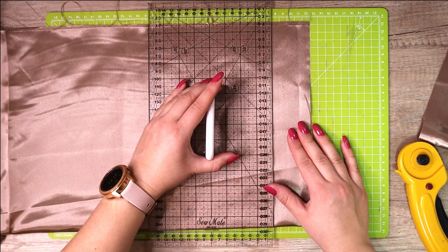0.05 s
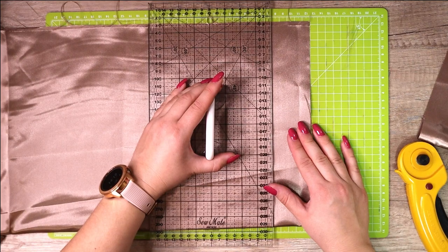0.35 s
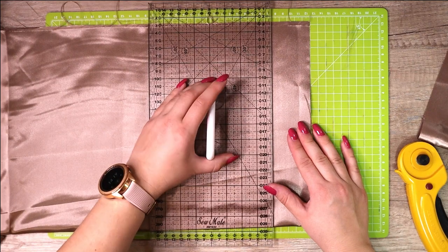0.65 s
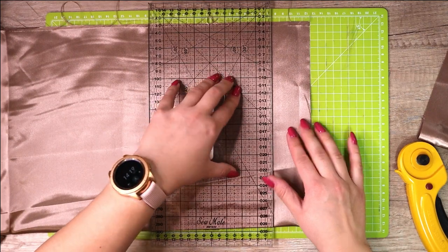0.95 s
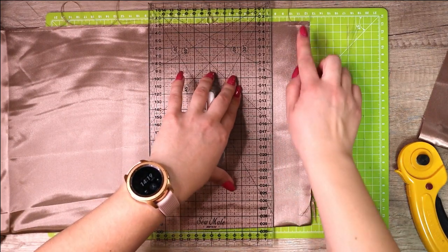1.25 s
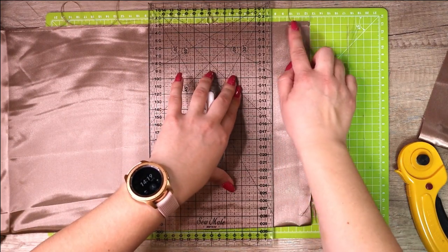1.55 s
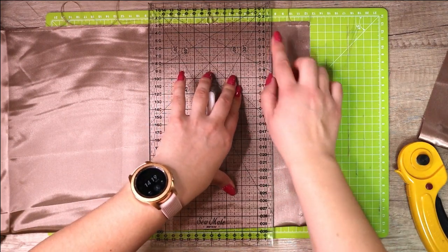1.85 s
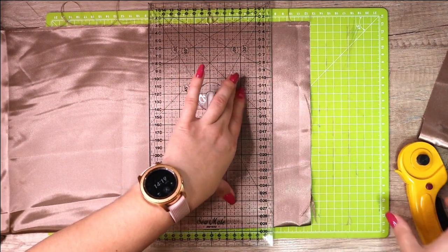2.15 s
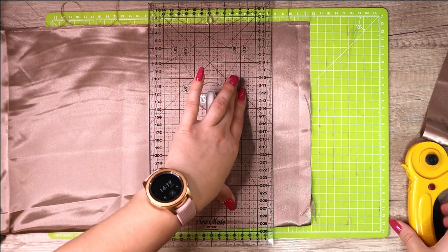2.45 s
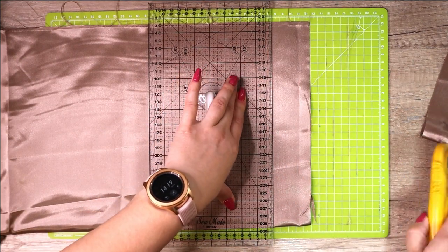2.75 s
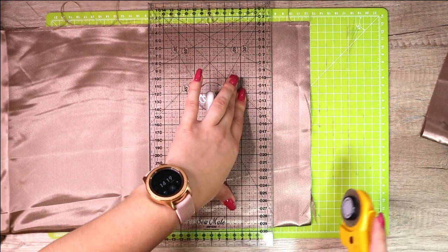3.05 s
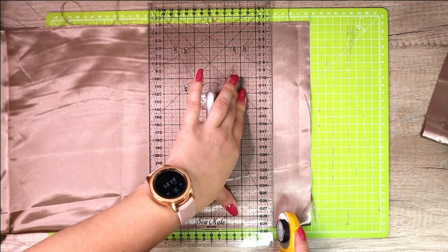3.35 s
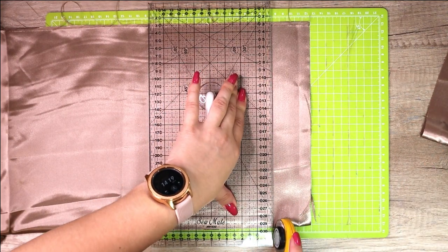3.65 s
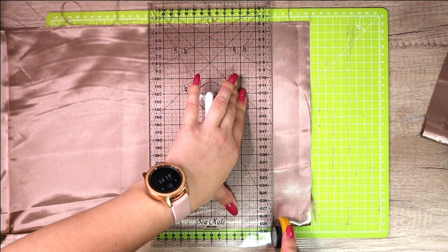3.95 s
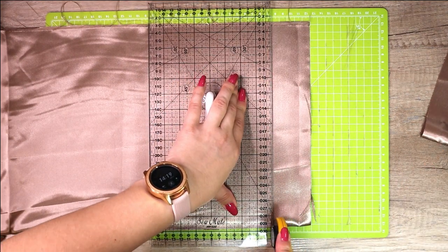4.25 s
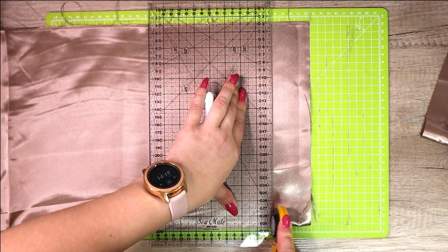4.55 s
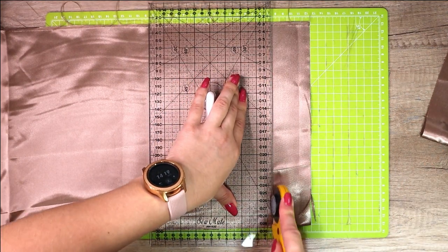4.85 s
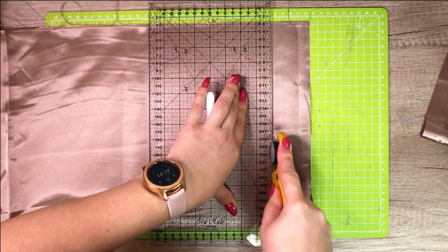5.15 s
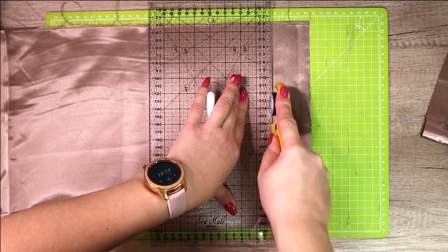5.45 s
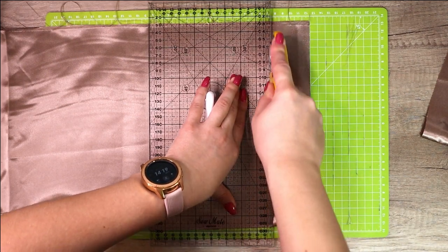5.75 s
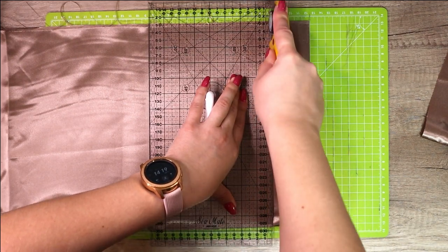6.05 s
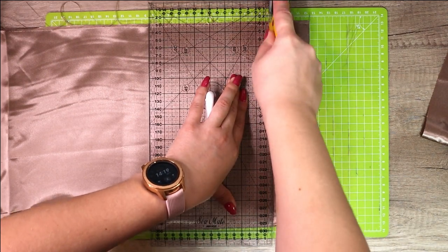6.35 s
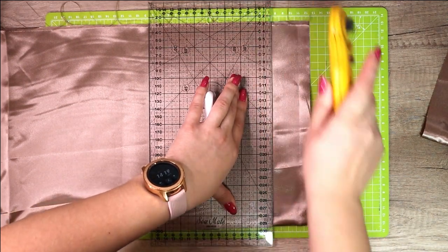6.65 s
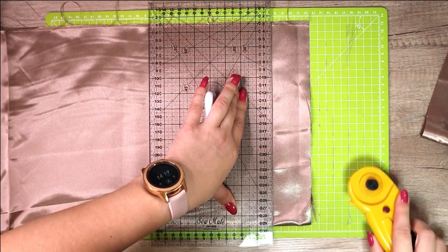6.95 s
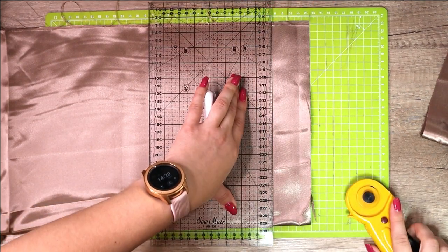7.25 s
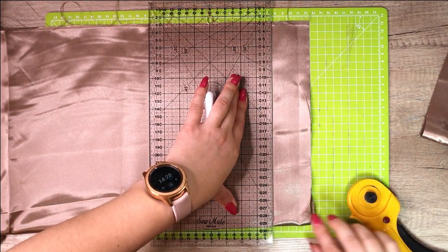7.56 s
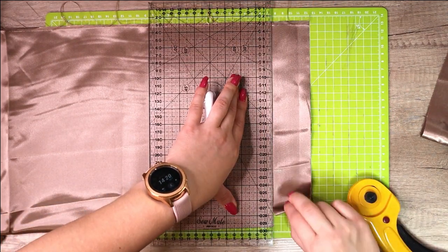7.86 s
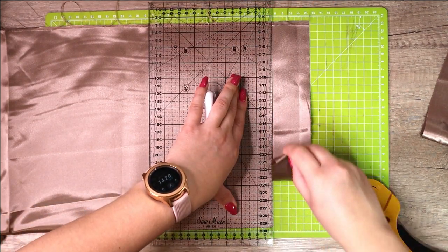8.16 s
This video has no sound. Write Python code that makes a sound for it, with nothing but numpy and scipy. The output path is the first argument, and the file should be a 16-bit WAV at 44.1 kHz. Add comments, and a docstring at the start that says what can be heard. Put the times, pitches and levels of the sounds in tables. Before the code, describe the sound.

Fingernails click on a plastic ruler, then a rolling blade rasps through cloth with small bumps before the cutter is set down.

```python
"""In a small room, satin is trimmed on a cutting mat on a wooden desk, heard from just above.
Fingernails click on a plastic ruler and the desk rumbles under leaning arms. A rotary cutter is picked
up, its hollow case knocking and scraping. Its round blade rolls through the cloth in one scratchy stroke,
snapping threads and bumping along the ruler. The cutter clatters down on the mat, and the satin strip
rustles as it is pulled away."""
import sys
import numpy as np
from scipy import signal
from scipy.fft import rfft, irfft
from scipy.io import wavfile

SR = 44100
rng = np.random.default_rng(int(sys.argv[2]) if len(sys.argv) > 2 else 0)


def to_wav(sig):
    """Store sig (one row per channel, or 1-D mono) as 16-bit WAV at the path in sys.argv[1].

    Samples outside -1..1 are clipped; the rate is SR.
    """
    pcm = np.clip(np.atleast_2d(sig), -1, 1) * 32767
    pcm = np.round(pcm).astype(np.int16)
    wavfile.write(sys.argv[1], SR, pcm.T)  # frames by channels


N = 370881
HZ, TIME = np.fft.rfftfreq(N, 1 / SR), np.arange(N) / SR
AGE = np.arange(SR // 6) / SR  # seconds since a hit
FADE_60_DB = np.log(1000)  # every fade_s below is the time to die away by 60 dB
CUT_START_S, CUT_END_S = 4.91, 6.11  # the blade is in the cloth


def amp(db):
    """Turns decibels into a number to multiply by."""
    return 10 ** (np.asarray(db) / 20)


def normalize(x):
    """Scales a sound to an average (rms) level of 1."""
    return x / np.sqrt(np.mean(x ** 2) + 1e-20)


def at_level(x, db):
    """Gives a short sound the energy of 20 ms at this level."""
    return amp(db) * x * np.sqrt(SR / 50 / np.sum(x ** 2))


def look_up(curve, hz):
    """Reads between the rows of a table that runs from low pitch to high."""
    pitches, values = np.transpose(curve)
    return np.interp(np.log(hz + 1), np.log(pitches), values)


def colour(x, tone):
    """Shapes a sound's lows and highs with a tone table, at an average level of 1."""
    return normalize(irfft(rfft(x) * amp(look_up(tone, HZ)), N))


def band(x, low_hz, high_hz, order=2):
    """Keeps the part of a sound between two pitches."""
    edges_hz = [low_hz, min(high_hz, SR / 2 - 1)]
    return signal.sosfilt(signal.butter(order, edges_hz, "band", fs=SR, output="sos"), x)


def add(mix, start_s, sound):
    """Mixes a sound in at its start time."""
    part = mix[round(start_s * SR):][:len(sound)]
    part += sound[:len(part)]


def held(start_s, end_s, attack_s, release_s):
    """A level that rises, holds until end_s, then dies away."""
    return np.clip((TIME - start_s) / attack_s, 0, 1) * np.exp(-np.maximum(TIME - end_s, 0) / release_s)


def slide(start_s, length_s, softness):
    """A slide speeds up and slows again; low softness makes it sudden."""
    progress = np.clip((TIME - start_s) / length_s, 0, 1)
    return (4 * progress * (1 - progress)) ** softness


def wander(rate_hz):
    """A random drift, up to about this fast."""
    turns_s = np.arange(0, TIME[-1] + 1, .5 / rate_hz)
    return normalize(np.interp(TIME, turns_s, rng.standard_normal(SR // 4)[:len(turns_s)]))


def tiny_slips(per_s, spread_db, clump_db, clump_hz):
    """Rubbing surfaces catch and let go in tiny, uneven clicks that come in clumps."""
    size = amp(spread_db * np.minimum(rng.exponential(1, N), 4))
    slips = size * rng.choice([-1, 1], N) * (rng.random(N) < per_s / SR)
    return normalize(slips * amp(clump_db * wander(clump_hz)))


def resonate(x, pitch_hz, width_hz):
    """Makes a sound ring around a pitch that may move; narrower rings longer."""
    turn = np.exp(2j * np.pi * np.cumsum(pitch_hz) / SR)
    feedback = np.exp(-np.pi * width_hz / SR)
    return normalize((turn * signal.lfilter([1 - feedback], [1, -feedback], x / turn)).real)


def favour(notes, pitch_hz, focus_db):
    """A hit wakes an object's own notes near one pitch; an octave away they lose focus_db."""
    return [(hz, db - focus_db * np.log2(hz / pitch_hz) ** 2, fade_s) for hz, db, fade_s in notes]


def ring(notes, uneven_db):
    """An object's notes ring and fade; each hit lands on a new spot and mixes them differently."""
    hz, db, fade_s = np.transpose(notes)[:, :, None]
    share = amp(db + uneven_db * rng.standard_normal(hz.shape)) * rng.choice([-1, 1], hz.shape)
    fades_per_s = 1 / fade_s + 5.6 * (hz / 2500) ** 2  # the hands stop high notes sooner
    return np.sum(share * np.exp(-FADE_60_DB * AGE * fades_per_s) * np.sin(2 * np.pi * hz * AGE), axis=0)


def burst(fade_s):
    """A puff of noise: the crowd of short-lived notes where two things meet."""
    return rng.standard_normal(len(AGE)) * np.exp(-FADE_60_DB * AGE / fade_s)


def snap(fade_s):
    """A hard first crack, then fading noise."""
    crack = amp(8) * np.exp(-FADE_60_DB * AGE / .004)
    return rng.standard_normal(len(AGE)) * (crack + np.exp(-FADE_60_DB * AGE / fade_s))


def hit(notes, ring_db, snap_db, pitch_hz, focus_db, noise_db, noise_s, snap_s, top_hz, rise_s,
        uneven_db, shine_db):
    """A struck part rings in the middle pitches, under a brief snap and the shine of its high notes."""
    tone = ring(favour(notes, pitch_hz, focus_db), uneven_db)
    noise = band(burst(noise_s), pitch_hz * .58, pitch_hz * 1.65)
    middle = band(normalize(tone) + amp(noise_db) * normalize(noise), 590, 9200)
    shine = amp(shine_db) * normalize(band(ring(notes, uneven_db), 6300, SR / 2))
    crack = normalize(band(snap(snap_s), 4000, SR / 2))
    treble = band(shine + crack, 2500, top_hz)
    rise = 1 - np.exp(-AGE / rise_s)  # the surfaces take a moment to meet
    return at_level(rise * middle, ring_db) + at_level(rise * treble, snap_db)


# what the walls throw back: pitch_hz, gain_db
WALL_TONE = [(100, -0.5), (200, 6), (1000, -1.5), (1700, 1), (7000, -1.5), (11000, -0.5), (16000, -13)]
# how long the room's echo lasts: pitch_hz, fade_s
ROOM_FADES = [(100, 0.26), (400, 0.3), (1000, 0.41), (2500, 0.36), (7000, 0.33), (15000, 0.24)]
def room(x, wet_db):
    """Adds a few near echoes, then a tail in which each pitch fades at its own speed."""
    length = SR // 2
    echoes = rng.standard_normal(length) * (rng.random(length) < 4000 / SR)
    hz, age_s, bands = signal.stft(echoes, SR, nperseg=256)
    fade = np.exp(-FADE_60_DB * age_s / look_up(ROOM_FADES, hz)[:, None])
    tail = signal.istft(bands * amp(look_up(WALL_TONE, hz))[:, None] * fade, SR, nperseg=256)[1]
    tail *= np.clip((np.arange(len(tail)) / SR - .004) / 0.011, 0, 1)
    tail *= 0.73 / np.linalg.norm(tail)
    for delay_s, gain in [(.0028, -0.16), (.0092, -0.15), (.0128, -.17), (.0205, 0.067)]:
        tail[round(delay_s * SR)] += gain
    return x + amp(wet_db) * signal.fftconvolve(x, tail)[:N]


# the tone of the quiet room: pitch_hz, gain_db
AIR_TONE = [(12, -29), (20, 1), (63, -10.5), (96, -9), (163, -16), (255, -17), (301, -22), (410, -22.5),
            (2750, -35), (3950, -36), (4810, -37.5), (14700, -41), (16000, -52.5)]
def room_air(level_db=-66.5):
    """Still air makes a faint, low hush."""
    return amp(level_db) * colour(rng.standard_normal(N), AIR_TONE)


# the notes of the desk under the mat: pitch_hz, gain_db, fade_s
DESK_NOTES = [(74.1, 7, 0.24), (116, -6, 0.064), (172.5, -8, 0.17), (197, 0.5, 0.12), (226, -7.5, 0.089),
              (290, -6, 0.1), (384.6, -0.5, 0.12), (417, -16.5, 0.023), (455.6, 1.5, 0.12), (488, 0, 0.059),
              (642, 3.5, 0.05), (770, 8.5, 0.026), (916, -3, 0.081)]
def desk_thud(pitch_hz, push_db, focus_db):
    """The desk answers a hit with a short push and the ring of its low notes."""
    push = band(burst(.022), pitch_hz * .5, pitch_hz * 1.6, order=3)
    wood = ring(favour(DESK_NOTES, pitch_hz, focus_db), uneven_db=1)
    return normalize(wood) + amp(push_db) * normalize(push)


# the notes of the ruler under a hand: pitch_hz, gain_db, fade_s
RULER_NOTES = [(1240, 14, 0.0071), (1645, -0.5, 0.017), (2050, -6, 0.014), (2610, 1.5, 0.0082),
               (3870, 5, 0.0065), (4630, 4.5, 0.008), (5100, 9.5, 0.011), (5300, 7, 0.0045),
               (6850, 10.5, 0.00895), (7300, 10.5, 0.014), (8640, -4, 0.0054), (10700, 22, 0.008)]
# light clicks on the ruler and mat: start_s, ring_db, thud_gain_db, pitch_hz, hardness (0-1)
NAIL_TAPS = [(0.751, -69.5, -66, 1200, 0.4), (0.791, -71.5, -64, 2500, 0.86),
             (0.8219, -76, -54.5, 2000, 0.82), (0.9811, -42, -45, 1850, 1), (0.9909, -57, -49, 1740, 0.8),
             (1.013, -58, -53, 1490, 0.5), (1.041, -49.5, -47, 1770, 0.89), (1.8861, -66.5, -66, 2140, 0.5),
             (2.918, -59, -76, 3320, 0.75), (2.9826, -48.5, -87, 2010, 0.51),
             (3.2961, -49, -72, 2840, 0.45), (3.4919, -63, -63, 1780, 0.6), (3.761, -65, -61, 1500, 0.7),
             (4.1836, -49, -54.5, 2490, 0.56), (6.3485, -64, -58, 1330, .05),
             (6.703, -56.5, -63, 1930, 0.4), (6.8287, -62.5, -60.5, 2400, 0.65),
             (6.906, -57, -79, 2080, 0.44), (7.0644, -56.5, -69, 1202, 0.1),
             (7.191, -47.5, -45, 2500, 0.49), (7.755, -64.5, -54, 1810, 0.77),
             (7.8216, -69, -61, 2550, 0.87), (8.0156, -62.5, -81, 1780, 0.72),
             (8.1556, -67.5, -85, 2700, 0.93)]
def nail_taps():
    """Nails and plastic edges click on the ruler; only the hardest clicks wake its high notes."""
    out = np.zeros(N)
    for start_s, ring_db, thud_gain_db, pitch_hz, hardness in NAIL_TAPS:
        snap_db = ring_db + np.interp(hardness, [0, 1], [-29, 6])
        shine_db = np.interp(hardness, [0, 1], [-28.5, -0.5])
        click = hit(RULER_NOTES, ring_db, snap_db, pitch_hz, focus_db=8.5, noise_db=2.5, noise_s=0.033,
                    snap_s=0.037, top_hz=8600, rise_s=0.00043, uneven_db=2.5, shine_db=shine_db)
        thud = desk_thud(176, push_db=-8.5, focus_db=8)
        add(out, start_s, click + at_level(thud, thud_gain_db - 1))
    return room(out, wet_db=-10)


# the round blade creeps while it is lined up, then runs: time_s, speed (0-1)
WHEEL_SPEEDS = [(3.86, 0.078), (4.68, 0.1), (4.8, 0.52), (4.96, 0.67), (5.2, 0.51), (5.62, 0.66),
                (5.9, 0.47), (5.99, 0.35), (6.1, 0.61)]
def wheel_speed():
    """How fast the blade rolls while it is on the mat, as a share of full speed."""
    on_mat = held(3.86, 6.12, attack_s=0.013, release_s=0.022)
    return np.interp(TIME, *np.transpose(WHEEL_SPEEDS)) * on_mat


# the deep sway of the desk: pitch_hz, gain_db
SWAY_TONE = [(4, -14), (9, 12), (13, -17.5), (17, 10), (22, -6), (28, -4.5), (34, -1), (40, -2.5),
             (47, -19), (70, -27.5), (200, -71)]
# arms lean on the desk: start_s, sway_db, rumble_db
ARM_LEANS = [(0.968, -51.5, -69), (2.3, -46.5, -74), (3.32, -42, -60), (3.96, -45.5, -39),
             (4.42, -52, -41.5), (4.75, -54, -38.5), (5.3, -50.5, -42), (5.57, -46, -44), (6.1, -39.5, -60),
             (6.49, -38, -61), (7.7, -54, -63)]
def desk_rumble(press_s=0.019, fade_db_per_s=10):
    """The desk sways after each lean, and rumbles under the blade, less as it rolls from the edge."""
    sway = colour(rng.standard_normal(N), SWAY_TONE)
    rumble = normalize(band(rng.standard_normal(N), 62, 119.5, order=3))
    speed = wheel_speed()
    sway_level = amp(-32) * speed + amp(-61) * (TIME > ARM_LEANS[0][0])
    rumble_level = amp(-45 - fade_db_per_s * np.maximum(TIME - CUT_START_S, 0)) * speed
    for start_s, sway_db, rumble_db in ARM_LEANS:
        lean = (start_s, start_s + press_s, press_s)
        sway_level = np.hypot(sway_level, amp(sway_db) * held(*lean, release_s=0.68))
        rumble_level = np.hypot(rumble_level, amp(rumble_db) * held(*lean, release_s=0.18))
    return sway * sway_level + rumble * rumble_level


# the tone of sliding skin: pitch_hz, gain_db
SKIN_TONE = [(200, 0.5), (600, 0.5), (1150, 6.5), (1600, -2.5), (2300, 4.5), (3000, -10), (4200, -9),
             (7000, -20.5), (15000, -31)]
# soft strokes of the hand: start_s, length_s, level_db
HAND_RUBS = [(1.49, 0.28, -80.5), (2.199, 0.11, -69), (4.05, 0.29, -68), (6.58, 0.17, -73),
             (6.87, 0.71, -66.5)]
def skin_rubs():
    """Skin slides softly over the handle and the mat."""
    slips = tiny_slips(per_s=5000, spread_db=1.5, clump_db=2, clump_hz=25)
    motion = sum(amp(db) * slide(start_s, length_s, softness=0.373) for start_s, length_s, db in HAND_RUBS)
    return colour(slips, SKIN_TONE) * motion


# the tone of sliding satin: pitch_hz, gain_db
SATIN_TONE = [(200, 8.5), (900, 8.5), (2200, 1), (4000, 0.5), (7000, -4), (12000, -6), (16000, -9)]
# hands and satin slide: start_s, length_s, gain_db, brightness_db
SATIN_SLIDES = [(1.78, 0.041, -59, 2.5), (1.848, 0.025, -59.5, 4), (2.225, 0.091, -55, 2.5),
                (2.8, 0.29, -60, 7.5), (3.03, 0.45, -61.5, -0.5), (3.79, 0.17, -56.5, -2),
                (4.468, 0.13, -44, -1.5), (6.132, 0.41, -72, 3), (6.447, 0.16, -49, -2.5),
                (6.89, 0.1, -61, 9), (7.803, .23, -55, 6), (8.048, 0.1, -57.5, 5.5),
                (8.162, 0.24, -65.5, 9)]
def satin_rustle():
    """Satin and skin slide in fine crackles; tight cloth hisses brighter."""
    crackle = colour(tiny_slips(per_s=1400, spread_db=2.7, clump_db=3.3, clump_hz=80), SATIN_TONE)
    dull = band(crackle, 75, 3500, order=1)
    gripping = held(2.3, 7.8, attack_s=0.13, release_s=0.14)  # the hand keeps rubbing the handle
    out = dull * amp(-70 - 2.5 * wander(3.6)) * gripping
    for start_s, length_s, gain_db, brightness_db in SATIN_SLIDES:
        rustle = dull / amp(brightness_db) + (crackle - dull) * amp(brightness_db)
        out += amp(gain_db - 10) * rustle * slide(start_s, length_s, softness=0.63)
    return out


# the notes of the cutter's hollow case: pitch_hz, gain_db, fade_s
CASE_NOTES = [(1262, -4, .045), (1490, -2, .06), (1590, 0, .065), (1680, -1, .06), (1848, 1, .07),
              (2150, -10, .025), (2640, -6, .05), (2790, -7, .05), (3090, 0, .08), (3260, -3, .06),
              (3760, -6, .04), (4090, -4, .04), (4370, -4, .035), (5390, -3, .03), (6390, -6, .03),
              (7100, -8, .018), (8660, -11, .014)]
# the cutter is picked up, and later dropped:
# start_s, ring_db, thud_db, ring_hz, thud_hz, hardness (0-1), freedom to ring (0-1)
CASE_KNOCKS = [(2.3469, -47, -49.5, 2900, 430, 0.57, 0.9), (2.35, -44.5, -54, 3000, 750, 0.48, 0.8),
               (2.7008, -36.5, -39.5, 1310, 270, 0, 0.5), (2.7061, -35, -44, 1660, 222, 0.45, 0.4),
               (2.7128, -35, -42, 1590, 208, 0.55, 0.7), (2.7757, -36, -63, 1890, 220, 0.49, 1),
               (7.3928, -55.5, -50, 2640, 304, 0, .3), (7.4017, -45.5, -42, 1940, 380, 0.8, 0.3),
               (7.4058, -40, -40, 2840, 370, 0.9, 0.6), (7.4317, -25, -32, 1450, 380, 0, .15),
               (7.4384, -31.5, -41, 1870, 320, 1, 0.35), (7.4491, -37, -37, 1600, 252, 0.5, 0.1)]
def case_knocks():
    """The case clatters: lifted, it rings clearly; flat on the mat, it gives a dull clack."""
    out = np.zeros(N)
    for start_s, ring_db, thud_db, ring_hz, thud_hz, hardness, freedom in CASE_KNOCKS:
        snap_db = ring_db + np.interp(hardness, [0, 1], [-24, -0.5])
        noise_db = np.interp(freedom, [0, 1], [4, -8])
        focus_db = np.interp(freedom, [0, 1], [3, 8])
        fade_share = np.interp(freedom, [0, 1], [0.6, 1])
        notes = [(hz, db, fade_s * fade_share) for hz, db, fade_s in CASE_NOTES]
        clack = hit(notes, ring_db, snap_db, ring_hz, focus_db, noise_db, noise_s=0.032,
                    snap_s=0.028, top_hz=8760, rise_s=0.00085, uneven_db=1.5, shine_db=-3.5)
        thud = desk_thud(thud_hz, push_db=-9.5, focus_db=7.5)
        add(out, start_s, clack + at_level(thud, thud_db))
    return room(out, wet_db=-10.5)


# the tone of the case scraping on wood: pitch_hz, gain_db
SCRAPE_TONE = [(150, -7), (300, 4), (404, 9.5), (620, -6), (856, 4), (1150, -15), (1570, -2.5), (1850, -2),
               (2400, -16), (3100, -5.5), (3900, -15), (5600, -20), (6400, -14.5), (7200, -23),
               (15000, -34)]
# the case is dragged in jerks before it is lifted: start_s, length_s, gain_db
CASE_DRAGS = [(2.372, 0.083, -46), (2.439, 0.026, -42.5), (2.468, 0.068, -44.5), (2.56, 0.3, -53)]
def case_scrape(scrape_db=-5, ring_db=-9):
    """The case sticks and slips over the wood, which keeps it ringing on one note, then another."""
    slips = tiny_slips(per_s=1800, spread_db=1.6, clump_db=2.6, clump_hz=60)
    ringing = np.zeros(N)
    for hz, db, fade_s in favour(CASE_NOTES, 1650, focus_db=9):
        width_hz = FADE_60_DB / np.pi / fade_s
        ringing += amp(db + 2.5 * wander(17)) * resonate(slips, np.full(N, hz), width_hz)
    motion = sum(amp(db) * slide(start_s, length_s, softness=1) for start_s, length_s, db in CASE_DRAGS)
    return (amp(scrape_db) * colour(slips, SCRAPE_TONE) + amp(ring_db) * normalize(ringing)) * motion


# the notes of the blade guard: pitch_hz, gain_db, fade_s
GUARD_NOTES = [(1240, -4, 0.02), (2890, -6, 0.014), (3570, -7, .022), (3720, -2, 0.021),
               (4150, -4.5, 0.012), (5270, -10, .008), (6900, -9, .008)]
# the guard shifts in the hand: start_s, level_db, pitch_hz
GUARD_TICKS = [(2.952, -60, 4700), (3.255, -59.5, 3600), (3.4922, -58.5, 3900), (3.676, -60.5, 4300),
               (3.687, -58.5, 3400), (3.76, -64.5, 2800), (3.8262, -61, 3450), (3.871, -60, 3000),
               (4.411, -51, 4200), (6.4267, -69.5, 1510), (6.565, -59, 3700)]
def guard_ticks(rise_s=0.00096):
    """The loose, thin plastic guard gives small ticks, each a little different."""
    out = np.zeros(N)
    for start_s, level_db, pitch_hz in GUARD_TICKS:
        click = amp(-9) * normalize(band(snap(0.028), 2000, 10000))
        tone = normalize(ring(favour(GUARD_NOTES, pitch_hz, focus_db=8), uneven_db=3))
        add(out, start_s, at_level((tone + click) * (1 - np.exp(-AGE / rise_s)), level_db))
    return room(out, wet_db=-12.5)


def moving_echoes(x, wet_db, spots_per_s=9, spots=11):
    """Echoes off hand, ruler, desk and walls change the tone at each spot the blade passes."""
    out = np.zeros(N)
    for spot in range(spots):
        passing = (TIME * spots_per_s - spot) % spots
        nearness = np.sin(np.pi / 2 * np.minimum(passing, 2))
        paths = burst(.014)[:SR // 100]
        paths *= .6 / np.linalg.norm(paths)
        paths[0] = 1  # the straight path to the ear
        out += room(signal.oaconvolve(x * nearness, paths / np.linalg.norm(paths))[:N], wet_db)
    return out


# the tone of snapping threads: pitch_hz, gain_db
THREAD_TONE = [(530, -25), (900, -5.5), (1300, -11), (1900, -8), (2300, -9), (2900, -9), (4000, -12),
               (5100, -14), (6100, -18), (7300, -14.5), (8500, -19), (12900, -22), (16000, -31)]
# the tone of the blade rolling on the mat: pitch_hz, gain_db
MAT_TONE = [(100, -41), (145, -10), (180, -3), (260, -13.5), (455, -1), (540, -3), (660, 1), (900, 0),
            (1100, -12), (1800, -28)]
# where the snapping threads set blade and ruler rasping: pitch_hz, width_hz, gain_db
RASP_BANDS = [(1570, 100, -6), (2170, 460, -13), (2780, 230, 7), (3240, 190, 1), (3760, 240, -7),
              (4820, 300, -3), (5240, 310, -1), (6950, 600, -8)]
# how hard the blade bites along the cut: time_s, rasp_gain_db, crackle_gain_db
BLADE_BITE = [(4.92, -56, -66), (4.96, -53, -49.5), (5.03, -58, -58.5), (5.12, -62, -61),
              (5.17, -59, -55.5), (5.27, -59, -61), (5.36, -49.5, -56.5), (5.43, -49, -55.5),
              (5.49, -61, -62), (5.56, -44, -55.5), (5.63, -46, -53), (5.7, -47, -56), (5.78, -52, -61.5),
              (5.86, -49, -55.5), (5.96, -63, -64.5), (6.03, -56, -62.5), (6.1, -49.5, -57),
              (6.13, -54, -67)]
def cutting(swell_db=2.5, pitch_drift=0.035):
    """Threads snap in quick, uneven bunches while the round blade grinds over the mat."""
    times_s, rasp_gains_db, crackle_gains_db = np.transpose(BLADE_BITE)
    rasp_db = np.interp(TIME, times_s, rasp_gains_db)
    crackle_db = np.interp(TIME, times_s, crackle_gains_db)
    snaps = tiny_slips(per_s=1250, spread_db=3.4, clump_db=2.6, clump_hz=80)
    crackle = amp(crackle_db + 7) * colour(snaps, THREAD_TONE)
    ringing = np.zeros(N)
    for hz, width_hz, db in RASP_BANDS:  # as the blade travels, the bands take turns ringing
        swell = amp(db + swell_db * wander(7.5))
        ringing += swell * resonate(snaps, hz * (1 + pitch_drift * wander(5)), width_hz)
    rasp = amp(rasp_db - 6) * normalize(band(ringing, 1100, 10200))
    # a few thick threads resist, then part with a crisp tick
    thick_snaps = tiny_slips(per_s=90, spread_db=2, clump_db=1.5, clump_hz=20)
    snags = amp(rasp_db - 10) * colour(thick_snaps, THREAD_TONE)
    grind = colour(tiny_slips(per_s=1400, spread_db=2, clump_db=4, clump_hz=45), MAT_TONE)
    speed = wheel_speed()
    rolling = speed * grind + (1 - speed) * band(grind, 49, 520)  # a creeping blade only grumbles
    hop = held(5.575, 5.595, attack_s=0.004, release_s=0.0021)  # the blade briefly leaves the cloth
    in_cloth = held(CUT_START_S, CUT_END_S, attack_s=0.032, release_s=0.022) * (1 - hop)
    return moving_echoes((crackle + rasp + snags) * in_cloth + amp(-41.5) * rolling * speed, wet_db=-2.5)


# the notes of the blade and its axle, pressed into the mat: pitch_hz, gain_db, fade_s
BLADE_NOTES = [(1144, 16, 0.023), (1680, 25, 0.0046), (1910, 0, 0.015), (2600, 2, 0.026), (4400, 1, 0.013),
               (6580, -2, 0.01)]
# the blade is set down, bumps along the ruler and runs off the mat:
# start_s, ring_gain_db, thud_gain_db, thud_hz, hardness (0-1)
BLADE_BUMPS = [(3.863, -60.5, -37, 177, 0.9), (3.96, -53, -42.5, 203, 0), (3.9877, -43, -34.5, 264, 0),
               (3.997, -63, -32, 116, 0.94), (4.341, -42, -30, 390, 0.97), (4.412, -45.5, -39, 288, 0.6),
               (4.4834, -46, -37, 273, 0.84), (4.5726, -46.5, -40.5, 258, 0.37),
               (4.6502, -55, -67, 300, 0.06), (4.6982, -53, -44.5, 167, 0.02), (4.778, -59, -55, 237, 0.8),
               (4.802, -48.5, -55, 171, 0), (4.8529, -40.5, -36.5, 280, 0.58),
               (4.9214, -49, -51, 176, 0.56), (5.294, -50, -46, 200, 0.55), (5.321, -49, -28, 197, 0.02),
               (5.337, -57, -36, 184, 0.06), (5.359, -45.5, -33, 246, 0.73), (5.597, -39.5, -31, 180, 0.64),
               (5.8975, -48.5, -57, 410, 0.83), (6.082, -47.5, -29, 204, 0), (6.105, -55, -38, 450, 0.2),
               (6.467, -52.5, -44, 206, 0), (6.5024, -42, -34, 262, 0.19), (6.518, -52, -35.5, 340, 0.4),
               (6.538, -51, -40, 344, 0.5)]
def blade_bumps(soft_hz=800, hard_octaves=1.72):
    """The blade ticks against the ruler and thumps through the mat; harder bumps ring higher."""
    out = np.zeros(N)
    for start_s, ring_gain_db, thud_gain_db, thud_hz, hardness in BLADE_BUMPS:
        ring_hz = soft_hz * 2 ** (hard_octaves * np.sqrt(hardness))
        snap_db = ring_gain_db + np.interp(hardness, [0, 1], [-30, -0.5])
        tick = hit(BLADE_NOTES, ring_gain_db - 1, snap_db, ring_hz, focus_db=1, noise_db=6.5,
                   noise_s=0.032, snap_s=0.034, top_hz=13000, rise_s=0.00094, uneven_db=3.5, shine_db=-1.5)
        thud = desk_thud(thud_hz, push_db=-5, focus_db=4)
        add(out, start_s, tick + at_level(thud, thud_gain_db - 1))
    return room(out, wet_db=-8)


# where the grazed blade rings: pitch_hz, width_hz, gain_db
ZING_BANDS = [(1590, 220, 4.5), (8550, 1100, -2), (14000, 3600, -8)]
# the blade grazes the ruler's end as it lifts off: start_s, level_db, fade_s
BLADE_GRAZES = [(6.534, -50, .045), (6.552, -59, .06)]
def blade_grazes(rise_s=.003):
    """Steel slides off plastic with a short, thin zing."""
    out = np.zeros(N)
    for start_s, level_db, fade_s in BLADE_GRAZES:
        scrape = burst(fade_s) * (1 - np.exp(-AGE / rise_s))
        zing = sum(amp(db) * normalize(band(scrape, hz - width_hz / 2, hz + width_hz / 2))
                   for hz, width_hz, db in ZING_BANDS)
        add(out, start_s, at_level(zing, level_db))
    return room(out, wet_db=-7)


def scene():
    """Everything on the desk sounds over the room's still air, in one channel."""
    air = room_air()
    friction = room(case_scrape() + satin_rustle() + skin_rubs(), wet_db=-5.5)
    hits = nail_taps() + guard_ticks() + case_knocks() + blade_bumps()
    return (air + friction + hits + cutting() + blade_grazes() + desk_rumble())[None]


def record(dry, top_hz=16000):
    """Takes away the very highest treble."""
    low_pass = signal.firwin(511, top_hz, window=("kaiser", 9), fs=SR)
    return signal.oaconvolve(dry, low_pass[None], "same")


dry = scene()
out = record(dry)
to_wav(out)
```